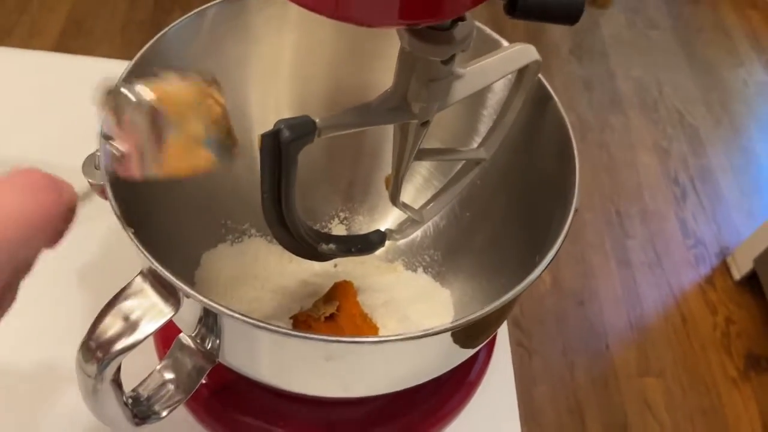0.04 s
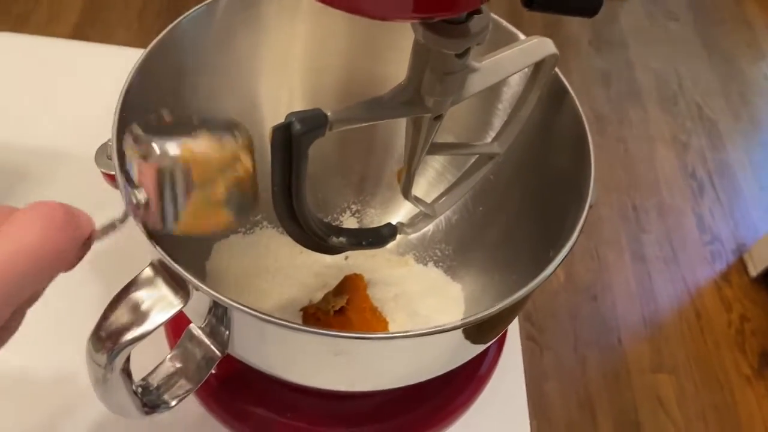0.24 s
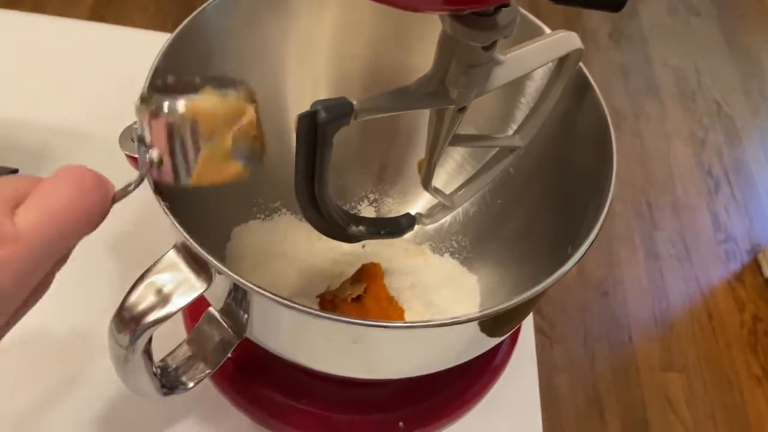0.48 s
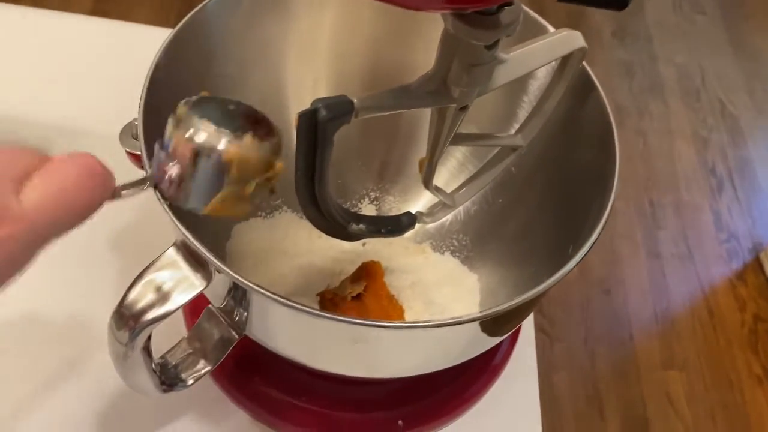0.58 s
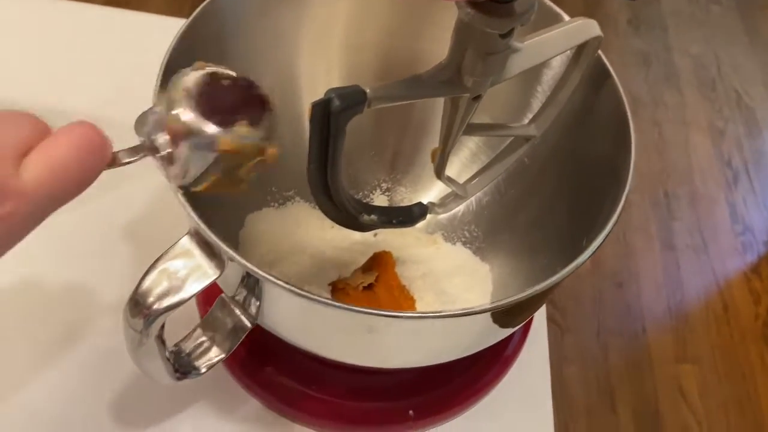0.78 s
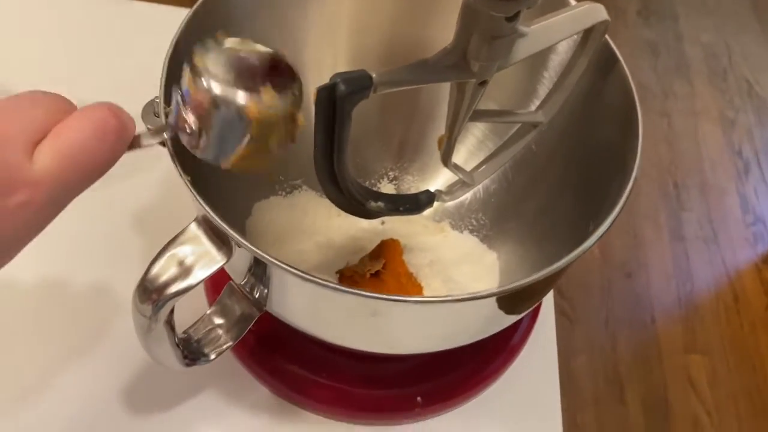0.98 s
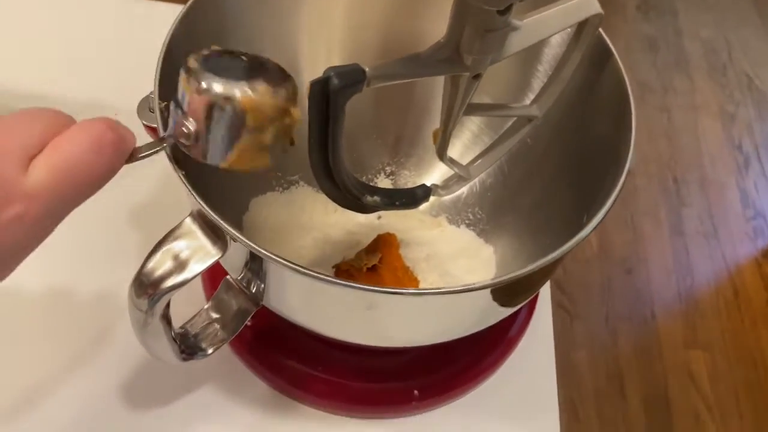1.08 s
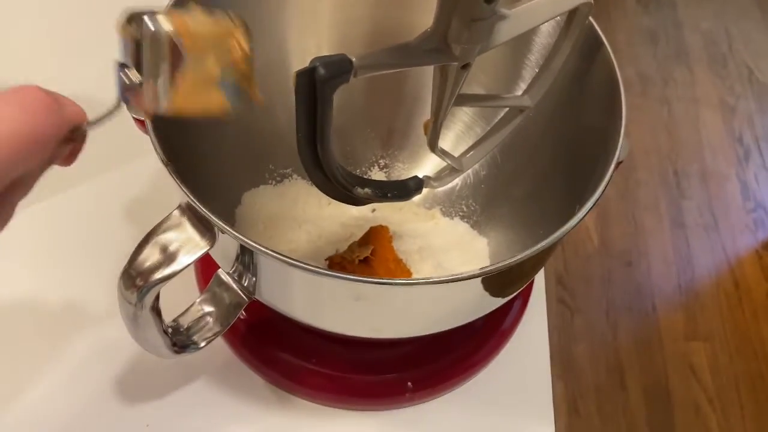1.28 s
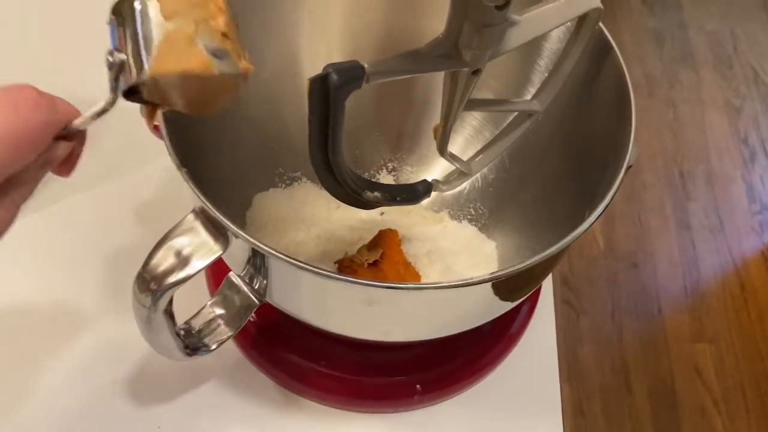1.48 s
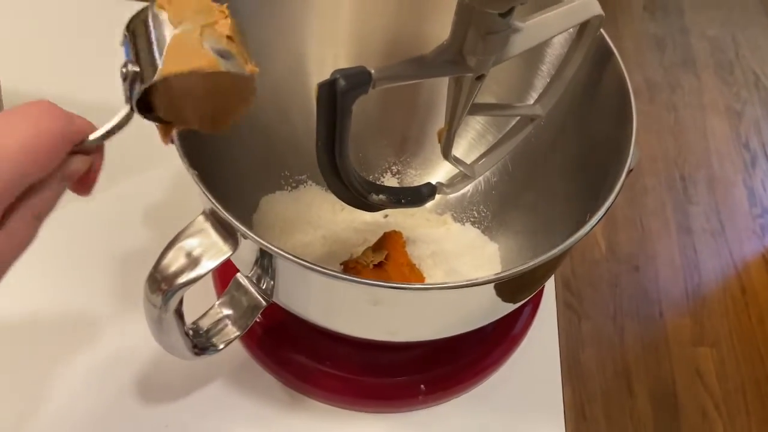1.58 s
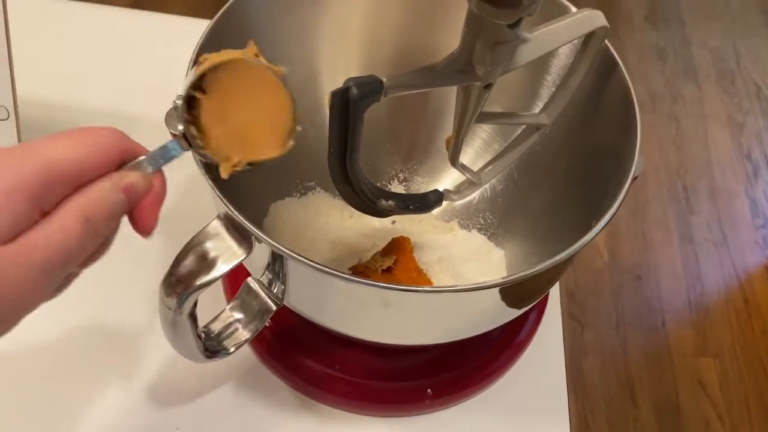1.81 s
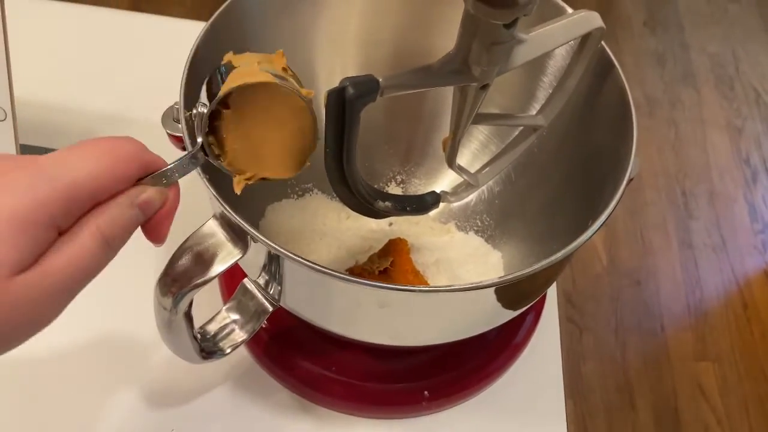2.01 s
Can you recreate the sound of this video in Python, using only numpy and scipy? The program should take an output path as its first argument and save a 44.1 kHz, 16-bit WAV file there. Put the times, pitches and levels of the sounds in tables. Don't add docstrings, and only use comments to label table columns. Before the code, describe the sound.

Loud metallic clacks of a food-coated cup against a steel bowl, then quiet and one dull knock

```python
import sys
import numpy as np
from scipy import signal
from scipy.io import wavfile
from scipy.ndimage import uniform_filter1d

SR = 44100
rng = np.random.default_rng(int(sys.argv[2]) if len(sys.argv) > 2 else 0)


def boost_factor(decibels):
    exponent = np.asarray(decibels, float) / 20
    return 10 ** exponent


def inscribe(sig):
    pcm = np.round(np.clip(np.atleast_2d(sig).T, -1, 1) * 32767)
    wavfile.write(sys.argv[1], SR, pcm.astype(np.int16))


N = 90404
LEAD_S, TAIL_S = 0.2, 0.9

# t/s, cup level/dB, bowl ring level/dB, crowded modes level/dB, brightness/(dB/octave)
BLOWS = [
    (-.05, -37, -19.5, -3.5, 0.5),
    (.0095, -49, -43, -32.5, -5),
    (.1370, 2.5, -26.5, 2, 1.5),
    (.1700, -22.5, -7.5, -11, -0.5),
    (.3230, 3, -9.5, 0.5, 1),
    (0.5042, -3.5, -20.5, -3.5, -1),
    (0.7276, -5.5, -12.5, 0, 0),
    (.7468, -8.5, 3.5, 3, 3),
    (1.7484, -36.5, -28.5, -8, 0),
]


def evened(x):
    return x / np.sqrt(np.mean(x ** 2) + 1e-20)


def read(points, hz):
    f, value = np.transpose(points)
    return np.interp(np.log(hz + 1), np.log(f + 1), value)


def split(modes, spread, count=4):
    split_db = -6
    hz, db, t60_s = np.transpose(modes)
    apart, lasting = rng.uniform(-1, 1, (2, count, len(hz)))
    all_hz = np.r_[hz, (hz * (1 + spread * apart)).ravel()]
    all_db = np.r_[db, np.tile(db + split_db, count)]
    all_t60_s = np.r_[t60_s, (t60_s * np.exp(0.3 * lasting)).ravel()]
    return all_hz, all_db, all_t60_s


def rings(hz, t60_s, length_s):
    t = np.arange(round(length_s * SR), dtype=np.float32) / SR
    hz = np.float32(hz)[:, None]
    t60_s = np.float32(np.clip(t60_s, 0.01, 0.55))[:, None]
    return np.sin(2 * np.pi * hz * t) * np.exp(-np.log(1000) * t / t60_s)


def strike(hz, db, t60_s, level_db, length_s):
    place_spread_db, slow_hz, slow_share = 1.5, 300, 0.55
    draw = rng.standard_normal((len(BLOWS), len(hz), 2))
    tilt_db = np.array(BLOWS)[:, 4:] * np.log2(np.maximum(hz, 1200) / 2500)
    share = boost_factor(db) / np.linalg.norm(boost_factor(db))
    weight = share * boost_factor(place_spread_db * draw[..., 0] + tilt_db)
    sign = np.where(hz < slow_hz, slow_share, np.sign(draw[..., 1]))
    return np.float32(weight * sign * boost_factor(level_db)[:, None]) @ rings(hz, t60_s, length_s)


def crowd(level_db, count=1100):
    # f/Hz, level/(dB per Hz)
    density = [(53, -38), (90, -13), (1270, -5), (1510, -5.5), (1870, -4), (3430, -14), (3910, -5.5),
               (9310, -12.5), (16000, -24.5)]
    # f/Hz, width/Hz, depth (0-1)
    dips = [(3450, 230, .3), (1697, 100, 0.8), (5030, 180, 0.8), (8570, 1500, 0.17)]
    # f/Hz, t60/s
    decay = [(100, 0.051), (500, 0.091), (2000, 0.079), (6000, 0.065), (15000, 0.051)]
    spread_db = 2.5
    draw = rng.standard_normal((3, count))
    place = (np.arange(count) + 0.5 * draw[2].clip(-1, 1) + 1) / count
    hz = 190 + 16000 * place ** 1.3
    db = read(density, hz) + 10 * np.log10((hz / 1000) ** 0.25) + spread_db * draw[0]
    for f, width, depth in dips:
        db = db + 20 * np.log10(1 - np.clip(depth, 0, 0.97) * np.exp(-((hz - f) / width) ** 2))
    t60_s = read(decay, hz) * np.exp(0.27 * draw[1])
    return strike(hz, db, t60_s, level_db, 0.16)


def chatter():
    decay_s, shape = 0.005, (len(BLOWS), 600)
    t = np.arange(600) / SR
    touch = rng.standard_normal(shape) * (rng.random(shape) < 0.04) * np.exp(-t / decay_s)
    touch[:, 0] = 4.5
    return touch / np.linalg.norm(touch, axis=1, keepdims=True)


def blows():
    # f/Hz, level/dB, t60/s
    bowl = [(1210, -16, .5), (1250, -19.5, 0.37), (3630, -17.5, 0.33), (3690, -15, 0.59), (3740, -18, 0.35),
            (3913, -4, 0.14), (4008, 2, 0.11), (3980, -13, .2), (4156, -6, .12), (4400, -15, 0.2),
            (5136, -15.5, .2), (5400, -12, .12), (5735, -5, 0.13), (6020, -8, .1)]
    cup = [(2649, 3.5, 0.051), (4270, -11, 0.037), (4670, -9.5, 0.065), (5133, -1.5, .065),
           (5790, -12, 0.14), (6835, -12, 0.1), (6960, -7.5, 0.05), (7090, -5.5, 0.044), (9120, -13, 0.08),
           (9960, -19.5, 0.06), (11030, -12.5, 0.032)]
    beater = [(572, -17.5, .15), (1002, -10.5, 0.35), (1294, -8, 0.45), (1488, -8.5, .08),
              (1885, 0.5, 0.083), (1990, -2.5, .06), (2133, 5, 0.12), (2204, 2, 0.11), (1146, -10, 0.38),
              (3110, -13, .06), (7600, -18.5, 0.087), (9480, -20, .15)]
    handle = [(284, -14.5, 0.12), (426.6, -3.5, 0.12), (510, -8.5, 0.42), (880, -11.5, 0.28),
              (1274, -7, 0.27), (1594, -9.5, .2), (1861, 3, .04), (2710, -4, .06), (2200, -5, 0.062),
              (3160, -0.5, .06), (3360, -12.5, 0.16), (1085, -12, .25), (6740, -1.5, 0.15),
              (6800, -1, 0.044)]
    stand = [(35.8, -10.5, 0.3027), (89, -12, .15), (135, -1.5, .14), (223, -8.5, 0.11),
             (160.4, -3.5, 0.16), (452, 0, 0.088)]
    lip = [(1144, -4.5, 0.28), (2060, 4.5, 0.14), (3620, -10, 0.2), (6000, -1, 0.29), (6360, -6.5, 0.3),
           (7360, 0, 0.23), (7670, -7, 0.27), (9120, -7, .2), (9950, -7.5, 0.22), (9900, -11.5, .2)]
    collar = [(3580, 3.5, 0.067), (3720, -12.5, .45), (3860, -2, 0.15), (3850, -16.5, 0.57),
              (4020, -11, .4), (4230, -12.5, 0.35), (4366, -9, .2), (4590, -12, .2), (9130, -11, .2)]
    base = [(728, 3, 0.12), (446, -1.5, 0.056), (210.5, -7.5, .15), (564.3, -14.5, 0.21)]
    side_wall = [(959, 1.5, .07), (1038, -3, 0.09), (911, -14.5, 0.52)]
    shoulder = [(2425, -2, 0.068), (2355, 1, .06), (1553, -5.5, 0.099), (2870, -6, .04), (2533, -9.5, 0.11)]
    spreads = (.007, .016, .016, .025, .02, .025, .009, .025, .02, .02)
    # beater level/dB, handle level/dB, stand thud level/dB
    shakes = [(-9.5, -20.5, -17), (-34, -49, -52), (-5, -34, -10), (-8, -32, -25), (-11, -28.5, -23),
              (-12.5, -32.5, -20), (-5, -30.5, -16), (-13.5, -31, -22), (-23, -8, -27.5)]
    lip_db = [-12, -47, -13.5, -21, -22.5, -28.5, -27, -20.5, -43.5]
    # collar level/dB, base level/dB, side wall level/dB, shoulder level/dB
    faces = [(-40.5, -40.5, -35.5, -34.5), (-58.5, -59.5, -55.5, -55.5), (-30, -8.5, -16.5, -18.5),
             (-31.5, -27.5, -15, -21.5), (-30.5, -11, -12, -6), (-36, -11.5, -11.5, -17),
             (-30, -13.5, -7.5, -11), (-24.5, -20.5, -18, -18.5), (-13.5, -33.5, -41.5, -31)]
    ring_s, rise_s = 0.85, 0.0016
    rows = np.array(BLOWS)
    out = np.zeros((3, 2, N + round((LEAD_S + TAIL_S) * SR)))

    parts = (bowl, cup, beater, handle, stand, lip, collar, base, side_wall, shoulder)
    levels_db = (rows[:, 2], rows[:, 1], *np.transpose(shakes), lip_db, *np.transpose(faces))
    clear = sum(strike(*split(modes, spread), level_db, ring_s)
                for modes, spread, level_db in zip(parts, spreads, levels_db))
    shell = crowd(rows[:, 3])
    rise = np.minimum(np.arange(clear.shape[1]) / (rise_s * SR), 1)
    for k, (s, ring, dense, hits) in enumerate(zip(rows[:, 0], clear, shell, chatter())):
        rattle = signal.fftconvolve(dense, hits)
        part = np.array([ring, np.pad(rattle, (0, len(ring) - len(rattle)))])
        start = round((s + LEAD_S) * SR)
        out[k % len(out), :, start:start + len(ring)] += part * rise
    return out


def kitchen(x):
    # f/Hz, t60/s
    decay = [(100, 0.66), (400, 0.45), (1200, 0.58), (4200, 0.49), (8000, 0.48), (15000, 0.34)]
    first_echo_s = 0.011
    taps = np.zeros(SR)
    at = np.arange(0, SR - 20, 10)
    taps[at + rng.integers(0, 10, len(at))] = rng.choice([-1., 1.], len(at))
    hz, t, z = signal.stft(taps, SR, nperseg=256)
    fade = boost_factor(-60 * t / read(decay, hz)[:, None])
    tail = signal.istft(z * fade, SR, nperseg=256)[1]
    tail = tail * (1 - np.exp(-(np.arange(len(tail)) / SR / first_echo_s) ** 2))
    return signal.fftconvolve(x, tail / np.linalg.norm(tail))[:len(x)]


def air():
    # f/Hz, level/(dB per Hz)
    spectrum = [(29, -24), (50, -0.5), (91, -17), (155, -7), (180, -19.5), (398, -14), (884, -27.5),
                (2750, -33.5), (16000, -51)]
    # f/Hz, width/Hz, level/dB
    peaks = [(2780, 180, 5), (4070, 300, 4), (1900, 400, -3), (6700, 300, 3), (60, 13, 2),
             (5190, 410, -4.5)]
    # f/Hz, level/dB
    hum = [(58.4, -57), (150, -63), (217, -68), (410, -66)]
    air_db = -54.5
    frames, hz = N // 256 + 5, np.fft.rfftfreq(1024, 1 / SR)
    a, b, patches = rng.standard_normal((frames, 513, 3)).T
    patches = evened(uniform_filter1d(uniform_filter1d(patches, 8, 0), 10, 1))
    bumps_db = sum(db * np.exp(-((hz - f) / width) ** 2) for f, width, db in peaks)
    level_db = (read(spectrum, hz) + bumps_db)[:, None] + 0.94 * patches
    z = (a + 1j * b) * boost_factor(level_db) * (hz[:, None] > 40)
    tone = boost_factor(air_db) * evened(signal.istft(z, nperseg=1024, noverlap=768)[1][:N])
    for f, db in hum:
        drift = evened(uniform_filter1d(rng.standard_normal(N), 3000))
        phase = 2 * np.pi * np.cumsum(f * (1 + 0.008 * drift)) / SR
        tone = tone + np.sqrt(2) * boost_factor(db) * np.sin(phase)
    return tone


def hand():
    # t/s, level/dB
    shaking = [(0.0, -25), (0.26, -29), (0.43, -23), (0.48, -32), (0.64, -28), (0.68, -43), (0.902, -26),
               (0.97, -37), (1.05, -28), (1.1, -42), (2.02, -42), (2.05, -26.5)]
    band_hz = (5, 17)
    sos = signal.butter(3, band_hz, "bandpass", fs=SR, output="sos")
    lumps = evened(signal.sosfilt(sos, rng.standard_normal(N + SR))[SR:])
    lumps = lumps / np.sqrt(uniform_filter1d(lumps ** 2, 6000) + 0.064)
    s, db = np.transpose(shaking)
    return lumps * boost_factor(np.interp(np.arange(N) / SR, s, db))


def scuff():
    start_s, length_s, band_hz, level_db = 1.61, 0.12, (910, 1700), -61.5
    u = np.clip((np.arange(N) / SR - start_s) / length_s, 0, 1)
    sos = signal.butter(2, band_hz, "bandpass", fs=SR, output="sos")
    return boost_factor(level_db) * np.sin(np.pi * u) * evened(signal.sosfilt(sos, rng.standard_normal(N)))


def scene():
    wet_db = -9
    clear_wet_db = -5.5
    metal = 0
    for clear, dense in blows():
        echo = kitchen(dense + boost_factor(clear_wet_db) * clear)
        metal = metal + clear + dense + boost_factor(wet_db) * echo
    metal = metal[round(LEAD_S * SR):][:N]
    return (metal + air() + hand() + scuff())[None]


def top_cut(x):
    return signal.sosfilt(signal.butter(12, 16320, fs=SR, output="sos"), x)


def record(dry):
    ceiling, edge_hz, over_edge_db = 0.87, 15850, -46
    flat = np.clip(dry, -ceiling, ceiling)
    sos = signal.ellip(10, 0.5, -over_edge_db, edge_hz, fs=SR, output="sos")
    mix = signal.sosfilt(sos, flat)
    return top_cut(mix)


dry = scene()
out = record(dry)
inscribe(out)
```